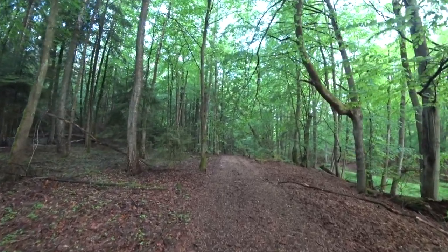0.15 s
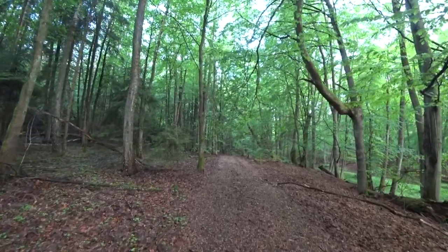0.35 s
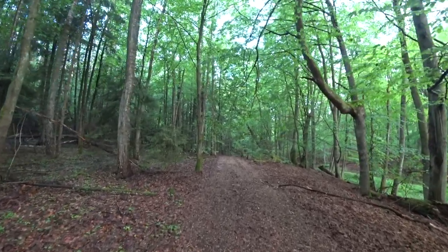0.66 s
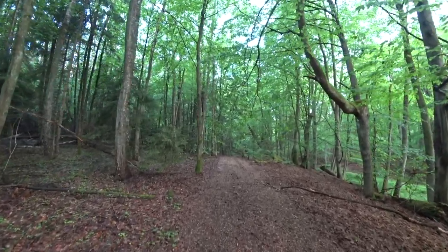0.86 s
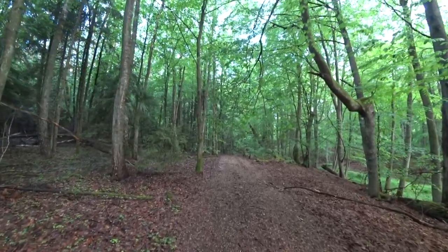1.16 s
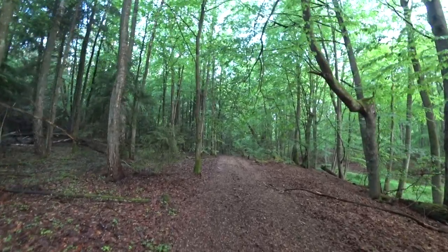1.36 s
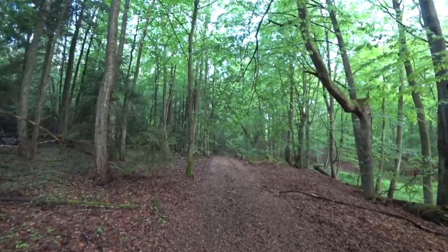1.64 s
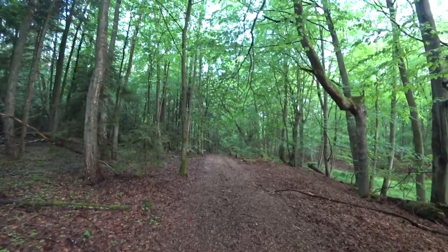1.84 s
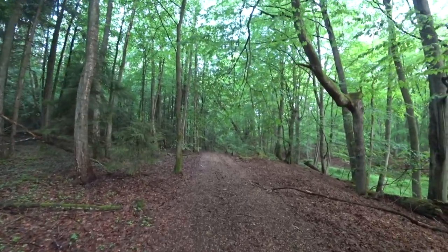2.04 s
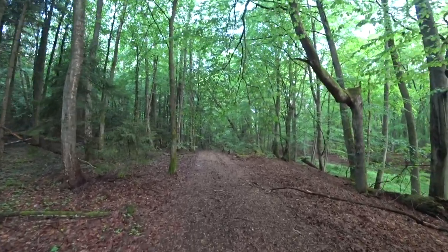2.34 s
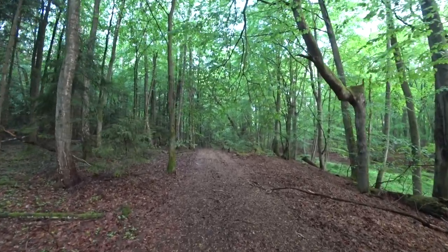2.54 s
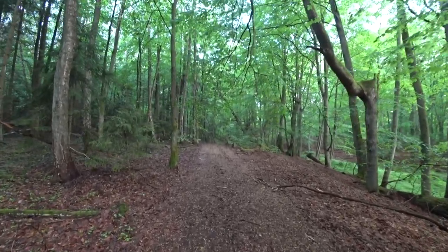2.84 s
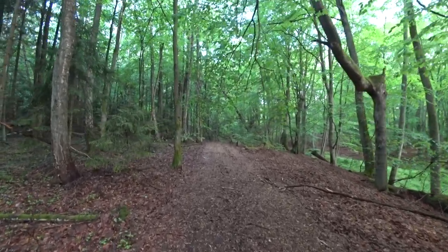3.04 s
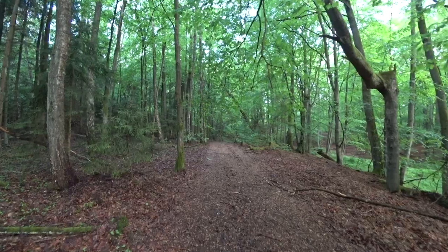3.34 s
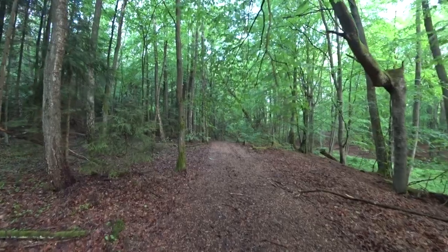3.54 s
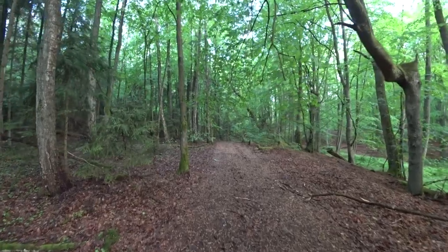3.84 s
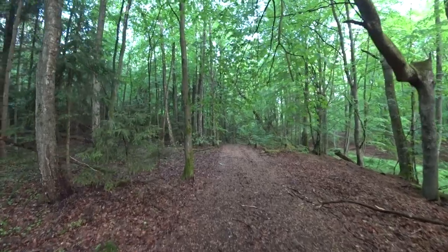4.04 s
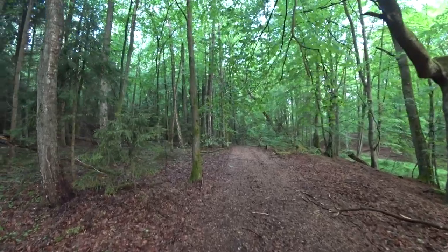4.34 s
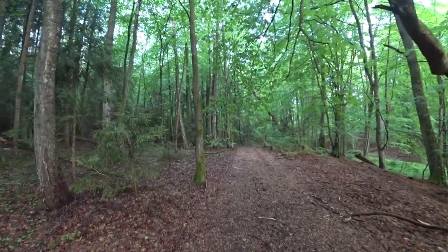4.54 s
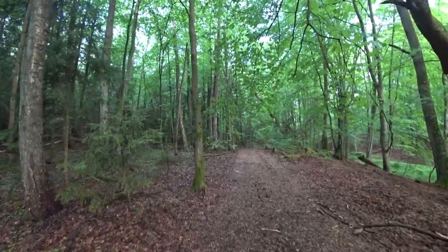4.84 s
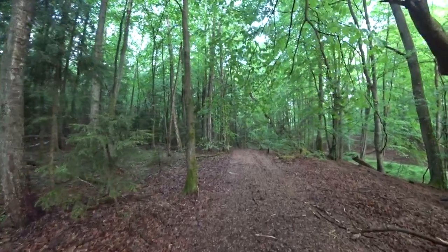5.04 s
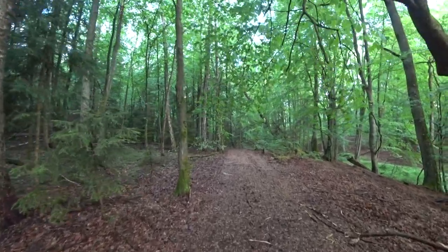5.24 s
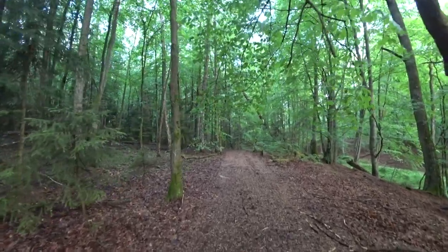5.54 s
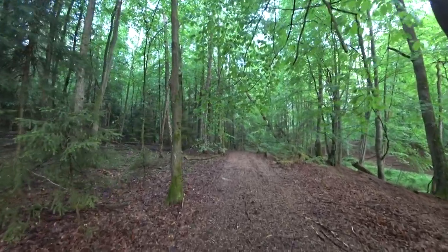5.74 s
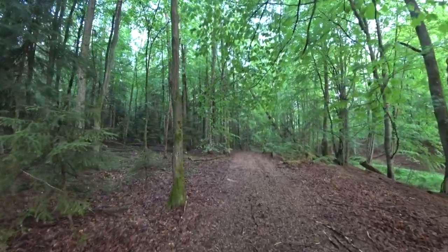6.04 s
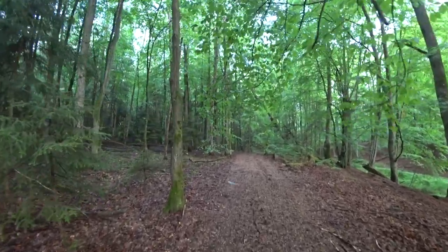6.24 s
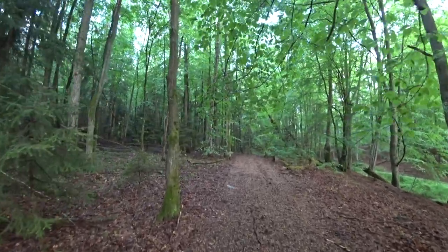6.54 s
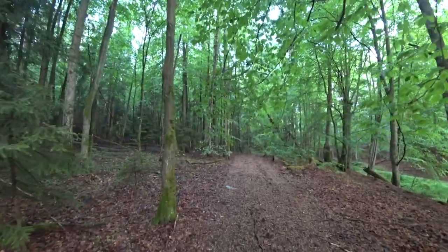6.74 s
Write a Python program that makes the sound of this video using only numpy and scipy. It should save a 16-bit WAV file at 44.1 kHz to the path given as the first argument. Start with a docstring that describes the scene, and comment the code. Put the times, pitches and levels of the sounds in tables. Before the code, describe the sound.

Songbirds chirp and whistle in a forest, one nearby speeding into a trill, over soft footsteps on dry leaves and faint wind.

```python
"""A near warbler speeds its chips into a trill in a beech wood at dawn. A thrush pipes three phrases
and other songbirds answer near and far. Each note is a gliding, nearly pure syrinx tone that the
trunks throw back. Someone walks the path, crushing dry leaves and snapping twigs; low wind and
leaf hiss lie underneath. All is centred but a faint microphone hiss."""
import sys
import numpy as np
from scipy import signal
from scipy.io import wavfile
from scipy.ndimage import uniform_filter1d

SR = 44100
rng = np.random.default_rng(int(sys.argv[2]) if len(sys.argv) > 2 else 0)


def output_pcm(signal):
    """Save a mono or channel-first signal as 16-bit PCM at the path in sys.argv[1].

    Samples are clipped to [-1, 1] before scaling.
    """
    pcm = np.clip(np.atleast_2d(signal).T, -1, 1) * 32767
    wavfile.write(sys.argv[1], SR, np.round(pcm).astype(np.int16))


N = 303849
LEAD = SR  # samples ahead of time zero, so earlier song still echoes


def amp(db):
    return 10 ** (np.asarray(db) / 20)


def unit_rms(x):
    return x / np.sqrt(np.mean(x ** 2) + 1e-20)


def smooth_twice(x, size):
    return uniform_filter1d(uniform_filter1d(x, size), size)


def curve_at(points, hz):
    point_hz, value = np.transpose(points)
    return np.interp(np.log(hz + 1), np.log(point_hz + 1), value)


def add(mix, start_s, sound):
    part = mix[LEAD + round(start_s * SR):][:len(sound)]
    part += sound[:len(part)]


def whistle(hz, level, second_db=-62, third_db=-60):
    """Syrinx tone: near sine with overtones, pitch slightly unsteady."""
    waver = unit_rms(uniform_filter1d(rng.standard_normal(len(hz)), size=200))
    phase = 2 * np.pi * np.cumsum(hz * (1 + .008 * waver)) / SR
    second = amp(second_db) * np.sin(2 * phase)
    third = amp(third_db) * np.sin(3 * phase) * (3 * hz < SR / 2)
    return level * (np.sin(phase) + second + third)


def trunk_echo(x, early_db, early_t60_s):
    """Scatter from trunks: a quick part, then a tail whose treble dies first."""
    # Each row: frequency in Hz, tail T60 in seconds.
    tail_t60 = [(1500, 1.56), (4000, 1.68), (8000, 1.26), (14000, 0.43)]
    hz, t, spectra = signal.stft(rng.standard_normal((3, 2 * SR)), SR, nperseg=128)
    fade = amp(-60 * t / curve_at(tail_t60, hz)[:, None]) + amp(early_db - 60 * t / early_t60_s)
    tails = signal.istft(spectra * fade, SR, nperseg=128)[1]
    tails[:, :round(.007 * SR)] = 0
    tails /= np.linalg.norm(tails[0])
    # Three tails take turns as air and leaves change the paths.
    phase = np.pi * (6 * np.arange(len(x)) / SR + np.arange(3)[:, None] / 3)
    weights = np.sqrt(2 / 3) * np.cos(phase)
    return signal.fftconvolve(x * weights, tails, axes=1).sum(0)[:len(x)]


def far_chorus():
    """Distant warbling: pitch wanders fast between two limits; only the echo arrives."""
    # Each row: start and length in seconds, level in dB, low and high limit in Hz.
    warbles = [(-.4, 0.43, -37.5, 3574, 6580), (0.844, 0.12, -41, 3970, 6070),
               (4.492, 0.52, -52, 4540, 6780), (5.8, 0.29, -45.5, 5660, 8560),
               (6.068, 0.093, -43, 3050, 4906)]
    sung = np.zeros(N + LEAD)
    for start_s, length_s, db, low_hz, high_hz in warbles:
        wander = unit_rms(smooth_twice(rng.standard_normal(SR), 350))[:round(length_s * SR)]
        height = .5 + np.arcsin(np.sin(2 * wander)) / np.pi  # folded into 0..1
        level = amp(db) * signal.windows.tukey(len(height), .2)
        add(sung, start_s, whistle(low_hz + (high_hz - low_hz) * height, level))
    return trunk_echo(sung, early_db=3, early_t60_s=.3)


def hiss(spectrum, patchy_db):
    """Shaped noise at unit RMS with drifting patches, steadier in the bass."""
    frames, hz = N // 256 + 5, np.fft.rfftfreq(1024, 1 / SR)
    real, imag, patches = rng.standard_normal((frames, 513, 3)).T
    patches = uniform_filter1d(patches, size=12, axis=0)
    patches = unit_rms(uniform_filter1d(patches, size=14, axis=1))
    db = curve_at(spectrum, hz)[:, None] + patchy_db * patches * (hz / (hz + 400))[:, None]
    return unit_rms(signal.istft((real + 1j * imag) * amp(db), nperseg=1024, noverlap=768)[1][:N])


def wind():
    """Low wind and leaf hiss."""
    # Each row: frequency in Hz, relative noise density in dB.
    spectrum = [(12, -30), (20, 15), (64, -2.5), (208, -11.5), (1310, -22), (2940, -22.5), (3370, -20.5),
                (4590, -19.5), (8230, -25.5), (15600, -38.5)]
    return amp(-45) * hiss(spectrum, patchy_db=1.3)


def microphone_hiss():
    """Faint self-noise, opposite in left and right."""
    # Each row: frequency in Hz, relative noise density in dB.
    spectrum = [(24, -41), (40, -7), (198, 3.5), (842, -0.5), (3010, -25), (3670, -26), (5340, -23),
                (6690, -15), (15600, 1.5)]
    return amp(-64) * hiss(spectrum, patchy_db=-5.5) * np.array([[1], [-1]])


def flutter(x, limit_db):
    """Moving air and leaves along the path make the level shiver."""
    shiver = unit_rms(smooth_twice(rng.standard_normal(N + LEAD), 120))
    return x * amp(limit_db * np.tanh(shiver))


def glide(length_s, start_hz, mid_hz, end_hz):
    """Pitch along a parabola through three points."""
    u = np.linspace(0, 1, round(length_s * SR))
    return 2 * (u - .5) * (start_hz * (u - 1) + end_hz * u) - 4 * mid_hz * u * (u - 1)


def sing(notes, fade_share, direct_db=None, tilt_db=0):
    """Whistled glides on two tracks: as sung, and with each note scaled by its direct_db."""
    sung, direct = np.zeros((2, N + LEAD))
    for k, (start_s, length_s, db, *path_hz) in enumerate(notes):
        hz = glide(length_s, *path_hz)
        fade = signal.windows.tukey(len(hz), fade_share)
        tone = whistle(hz, amp(db + tilt_db * np.linspace(-.5, .5, len(hz))) * fade)
        add(sung, start_s, tone)
        add(direct, start_s, tone * amp(direct_db[k] if direct_db else 0))
    return np.array([sung, direct])


def repeats(song, start_s, period_s, count):
    """Rows for one note repeated evenly, its level going from first_db to last_db."""
    first_db, last_db, length_s, *path_hz = song
    return [(start_s + k * period_s, length_s, db, *path_hz)
            for k, db in enumerate(np.linspace(first_db, last_db, count))]


def songbirds():
    """Scattered notes, the far ones mostly echo, and three birds that repeat a figure."""
    # Each row: start and length in seconds, level in dB, start and end pitch in Hz, distance in metres.
    calls = [(0.046, 0.011, -37, 5680, 6600, 8.1), (0.08, 0.012, -32, 5110, 6400, 12.5),
             (0.134, 0.017, -31, 5730, 3980, 18), (0.222, 0.011, -41, 3830, 6100, 15),
             (0.228, .01, -38, 6140, 6070, 9.2), (0.261, 0.0098, -31, 5620, 5520, 12),
             (0.317, 0.018, -35.5, 5650, 4630, 13), (0.405, 0.028, -30.5, 4340, 4003, 18),
             (0.439, 0.014, -32, 4100, 3870, 18), (0.428, 0.016, -49, 7200, 7300, 41),
             (0.487, 0.044, -32, 6060, 3724, 12.7), (0.532, 0.039, -48.5, 7950, 7670, 41),
             (0.567, 0.019, -43, 4030, 4980, 12), (0.586, 0.013, -34.5, 5120, 5830, 12),
             (0.636, 0.019, -33, 4690, 5260, 6.4), (0.646, 0.014, -39.5, 5340, 5870, 9.4),
             (0.698, 0.014, -39.5, 3610, 2920, 10), (0.709, 0.06, -41, 3200, 3795, 16),
             (0.734, 0.046, -45, 7480, 6230, 22), (0.781, 0.067, -33.5, 6350, 3800, 15),
             (0.94, 0.064, -53, 7300, 7700, 54), (1.037, 0.018, -51, 6700, 8700, 10),
             (1.048, 0.033, -49, 8700, 6940, 18), (1.178, 0.073, -54, 7100, 6760, 42),
             (1.468, 0.032, -44.5, 5820, 6500, 50), (2.089, 0.052, -44, 5100, 3770, 18),
             (2.169, 0.034, -41, 7300, 7660, 59), (2.351, 0.025, -41.5, 3490, 5670, 22),
             (2.382, 0.042, -42.5, 5370, 3790, 15), (2.475, 0.022, -42.5, 3700, 5880, 15),
             (2.488, 0.043, -43.5, 5950, 5440, 9.9), (2.605, 0.027, -40, 3246, 5030, 15),
             (3.041, 0.0089, -37, 4660, 7130, 29), (3.214, 0.032, -38, 4620, 4430, 15),
             (3.351, 0.033, -52, 4480, 4500, 18), (3.331, 0.025, -37, 6000, 4760, 35),
             (3.389, 0.052, -37, 2405, 2330, 17), (4.069, 0.089, -49, 4300, 2300, 7.8),
             (4.169, 0.062, -37, 2380, 2276, 7.1), (4.517, 0.04, -42.5, 6430, 6540, 38),
             (4.636, 0.018, -35.5, 2704, 4760, 49), (4.658, 0.025, -35, 4124, 2750, 21),
             (4.674, 0.023, -40, 2660, 3290, 6.9), (4.713, 0.0172, -43.5, 3400, 2500, 7.4),
             (4.818, 0.058, -43.5, 6950, 6090, 40), (4.87, 0.055, -45, 5960, 5800, 45),
             (5.1, 0.18, -63, 3740, 3760, 53), (5.44, .09, -55, 3800, 3770, 60),
             (5.243, 0.091, -54, 6640, 6760, 30), (5.533, 0.06, -48.5, 4270, 3210, 17),
             (5.56, 0.059, -48, 5250, 5670, 61), (5.74, 0.058, -53, 2860, 3210, 45),
             (5.772, 0.011, -39, 8800, 7870, 40), (5.79, 0.018, -46, 8100, 7520, 41),
             (5.81, 0.04, -45, 3940, 3520, 41), (6.014, 0.09, -40.5, 5510, 3160, 46),
             (6.092, 0.037, -47, 3300, 3170, 50), (6.525, 0.06, -53, 1828, 1770, 12),
             (6.574, 0.017, -38, 2315, 2490, 23), (6.576, 0.056, -39, 2513, 3104, 47),
             (6.67, 0.027, -45, 3350, 3410, 7.1), (6.689, 0.02, -39.5, 2980, 3180, 8.4),
             (6.705, 0.011, -37, 3470, 2740, 6.4), (6.712, 0.033, -33, 2657, 2542, 9.8),
             (6.757, 0.014, -41.5, 2710, 2060, 6.9), (6.779, 0.031, -39, 2496, 2593, 8.6)]
    # Each song: first and last level in dB, note length in seconds, start, middle and end pitch in Hz.
    rise_song = (-43, -50, .038, 4220, 4640, 6150)
    drop_song = (-45, -42.5, .028, 3620, 3210, 3200)
    fall_song = (-44, -44, .047, 3850, 3350, 2350)
    upturn_song = (-47, -47, .016, 2500, 2950, 3600)
    mid_share, echo_equal_m = .59, 13  # glide done by mid-note; range where direct tone equals echo
    notes = [(start_s, length_s, db, start_hz, start_hz + mid_share * (end_hz - start_hz), end_hz)
             for start_s, length_s, db, start_hz, end_hz, _ in calls]
    direct_db = [20 * np.log10(echo_equal_m / distance_m) for *_, distance_m in calls]
    sung, direct = flutter(sing(notes, fade_share=.55, direct_db=direct_db), limit_db=4.5)

    rise_notes = repeats(rise_song, start_s=1.267, period_s=.0918, count=8)
    rises = flutter(sing(rise_notes, fade_share=.25, tilt_db=-10)[0], limit_db=3)
    drop_notes = repeats(drop_song, start_s=2.711, period_s=.0628, count=8)
    drops = sing(drop_notes, fade_share=.037)[0]
    fall_notes = repeats(fall_song, start_s=3.255, period_s=.15, count=4)
    fall_notes += repeats(upturn_song, start_s=3.315, period_s=.15, count=4)
    falls = flutter(sing(fall_notes, fade_share=.3, tilt_db=6)[0], limit_db=3.75)

    echo = trunk_echo(sung + amp(-.5) * rises + amp(-3.5) * drops, early_db=3.5, early_t60_s=.078)
    blurred_falls = amp(-7) * falls + trunk_echo(falls, early_db=14, early_t60_s=.08)  # nearby leaves
    return direct + rises + drops + blurred_falls + flutter(echo, limit_db=2.25)


def leaf_crunch():
    """Dry leaves crackle in clumped grains under each step."""
    # Each row: start and length in seconds, level in dB.
    steps = [(0.17, 0.18, -50.5), (0.7, 0.14, -48.5), (0.858, 0.13, -48.5), (2.38, 0.1, -45),
             (2.617, 0.11, -46.5), (2.812, 0.062, -46.5), (3.204, 0.12, -45), (3.506, 0.12, -46.5),
             (4.148, 0.26, -48.5), (4.767, 0.16, -47.5), (5.925, 0.22, -46.5), (6.174, 0.055, -48),
             (6.807, 0.098, -43.5)]
    # Each row: frequency in Hz, relative noise density in dB.
    spectrum = [(150, 12.5), (600, 14.5), (2000, 9.5), (5000, 10.5), (12000, 0), (16000, -45)]
    grains_per_s = 2500
    crunch = np.zeros(N + LEAD)
    for start_s, length_s, db in steps:
        add(crunch, start_s, amp(db) * np.hanning(round(length_s * SR)))
    grain_db = 3 * np.minimum(rng.exponential(1, N), 4)
    grains = amp(grain_db) * (rng.random(N) < grains_per_s / SR)
    clumps = unit_rms(signal.oaconvolve(grains, np.exp(-np.arange(200) / 40))[:N])
    crunch[LEAD:] *= clumps * hiss(spectrum, patchy_db=4.5)
    return crunch


def thrush():
    """Fluted phrases, a pipe then an arch, far enough that echo rivals the direct tone."""
    # Each row: pipe start, arch start and arch length in seconds, pipe level in dB,
    # pipe pitch and warble depth in Hz, arch level in dB, arch top in Hz.
    phrases = [(0.711, 0.862, .182, -35, 2690, 30, -36, 3400),
               (1.183, 1.335, .178, -32.5, 2800, 200, -37, 3520),
               (1.858, 2.036, .172, -33, 2740, 100, -37, 3380)]
    # Each row: share of arch length, share of top pitch.
    arch_pitch = [(0, .47), (.1, .8), (.2, 1), (.38, .98), (.54, .86), (.64, .72), (.76, .65), (1, .57)]
    # Each row: share of arch length, relative level in dB.
    arch_level = [(0, -24), (.09, -8), (.25, 1), (.6, -2), (.88, -5), (1, -12)]
    slur_from_hz, slur_s, slur_quiet_db, fade_db_per_s = 1500, .014, 25, 110
    warble_rate_hz, crest_s = 20, .032
    sung = np.zeros(N + LEAD)
    for pipe_s, arch_s, length_s, pipe_db, pipe_hz, depth_hz, arch_db, top_hz in phrases:
        t = np.arange(0, arch_s - pipe_s, 1 / SR)
        slur = np.exp(-(t / slur_s) ** 2)  # the pipe starts low and quiet
        warble_hz = depth_hz * np.cos(2 * np.pi * warble_rate_hz * (t - crest_s))
        hz = pipe_hz - (pipe_hz - slur_from_hz) * slur + warble_hz
        level = amp(pipe_db - slur_quiet_db * slur ** .8 - fade_db_per_s * t)
        add(sung, pipe_s, whistle(hz, level * signal.windows.tukey(len(t), .05)))
        u = np.linspace(0, 1, round(length_s * SR))
        hz = top_hz * np.interp(u, *np.transpose(arch_pitch))
        level = amp(arch_db + np.interp(u, *np.transpose(arch_level)))
        add(sung, arch_s, whistle(hz, level * signal.windows.tukey(len(u), .05)))
    sung = flutter(sung, limit_db=7.5)
    return amp(-1.5) * sung + amp(-2.5) * trunk_echo(sung, early_db=-7, early_t60_s=.18)


def warbler_chips():
    """Fast rises that level off, each doubled lower by the other side of the syrinx."""
    # Each row: time in seconds, level in dB.
    chips = [(1.2473, -33.5), (1.457, -37), (1.616, -30), (1.768, -31.5), (1.9108, -30), (2.054, -30),
             (2.2045, -29), (2.348, -24), (2.497, -22.5), (2.642, -22.5), (2.785, -22), (2.908, -25),
             (3.016, -23), (3.12, -20), (3.225, -26.5)]
    upper_top_hz, lower_top_hz, last_sag_hz = 8956, 8530, 1100
    sung = np.zeros(N + LEAD)
    t = np.arange(round(.02 * SR)) / SR
    fade = signal.windows.tukey(len(t), .3)
    quiet_db = 30 * np.exp(-t / .0075)  # the low start is weak, its overtone strong
    for time_s, db in chips:
        upper_hz = upper_top_hz - 5900 * np.exp(-t / .0052)
        second_db = -40 + 1.9 * quiet_db + .5 * (db + 28)
        add(sung, time_s - .001, whistle(upper_hz, amp(db - quiet_db) * fade, second_db))
        lower_hz = lower_top_hz - last_sag_hz * (time_s == chips[-1][0]) - 2000 * np.exp(-t / .00552)
        lower = whistle(lower_hz, amp(db - 9 - 200 * t) * fade, second_db=-40 + .86 * quiet_db)
        add(sung, time_s + .0088, lower)
    return sung


def warbler_trill():
    """Rising sweeps that lengthen and sink as the trill goes on, each closed by a thin high flick."""
    # Each row: start in seconds, level in dB.
    sweeps = [(3.283, -28.5), (3.335, -25.5), (3.391, -22.5), (3.444, -20.5), (3.496, -22), (3.552, -20),
              (3.607, -18), (3.661, -18), (3.719, -16.5), (3.772, -16), (3.83, -15), (3.886, -15),
              (3.946, -15), (4.004, -13.5), (4.062, -14.5), (4.122, -18.5), (4.186, -18.5)]
    # A sweep lingers low, then leaps. Each row: share of length, share of rise.
    sweep_shape = [(0, 0), (.14, .17), (.5, .36), (.72, .6), (.92, .96), (1, 1)]
    flick_loudest_s, flick_spread_s = 3.79, .36
    flick_hz = glide(.0071, 8550, 8480, 7100)
    sung = np.zeros(N + LEAD)
    for start_s, db in sweeps:
        age_s = start_s - sweeps[0][0]
        length_s = .024 + .0125 * age_s
        foot_hz, top_hz = 5376 - 1900 * age_s, 7854 - 404 * age_s
        u = np.linspace(0, 1, round(length_s * SR))
        risen = uniform_filter1d(np.interp(u, *np.transpose(sweep_shape)), size=200, mode="nearest")
        hz = foot_hz + (top_hz - foot_hz) * risen
        dip_db = 3 * np.exp(-((u - .47) / .33) ** 2)  # weaker where the leap starts
        fade = np.minimum(u / .3, 1) ** 2 * np.minimum((1 - u) / .13, 1)
        level = amp(db - 3.8 * (u - .7) ** 2 - dip_db) * fade
        add(sung, start_s, whistle(hz, level, second_db=-28 - 13.5 * u, third_db=-39))
        flick_db = -36.5 - 10 * ((start_s - flick_loudest_s) / flick_spread_s) ** 2
        add(sung, start_s + length_s - .003, whistle(flick_hz, amp(flick_db) * np.hanning(len(flick_hz))))
    return sung


def warbler():
    """The near bird: direct song, first bounces off ground and trunks, then dense scatter."""
    # Each row: delay in seconds, gain in dB.
    bounces = [(.0055, -17), (0.011, -15)]
    song = flutter(warbler_chips() + warbler_trill(), limit_db=3)
    lowpassed = signal.oaconvolve(song, signal.firwin(9, 11000, fs=SR), "same")
    dull = lowpassed + amp(-2.5) * song  # bark and leaves return less treble
    for delay_s, db in bounces:
        add(song, delay_s - LEAD / SR, amp(db) * flutter(dull, limit_db=4.5))
    return song + amp(-7.5) * trunk_echo(dull, early_db=17, early_t60_s=.3)


def twig_snaps():
    """Twigs, crisp leaves and dry stalks break and ring for a few cycles."""
    # Each row: start in seconds, level before decay in dB, pitch in Hz.
    snaps = [(2.418, -42, 594), (2.853, -26, 784), (3.374, -23, 11100), (3.507, -25, 646),
             (4.277, -25, 920), (4.304, -45, 7000), (4.8594, -51, 7000), (5.572, -24.5, 530),
             (5.7050, -12, 8000), (6.04, -24, 1310), (6.233, -27.5, 930), (6.848, -14, 3200)]
    decay_db_per_cycle = 12
    out = np.zeros(N + LEAD)
    for start_s, db, hz in snaps:
        cycles = hz * np.arange(2000) / SR
        level = amp(db - decay_db_per_cycle * cycles) * np.minimum(cycles, 1)
        add(out, start_s, level * np.sin(2 * np.pi * cycles))
    return out


def heel_thuds():
    """A heel lands: one low cycle of push and recoil."""
    # Each row: start in seconds, peak in dB, frequency in Hz.
    thuds = [(5.714, -41.5, 150), (5.849, -31, 112)]
    out = np.zeros(N + LEAD)
    t = np.arange(2000) / SR
    for start_s, db, hz in thuds:
        add(out, start_s, amp(db) * np.sin(2 * np.pi * np.minimum(hz * t, 1)))
    return out


def scene():
    """Birds, feet and wind in the centre, over microphone hiss."""
    birds = warbler() + songbirds() + thrush() + far_chorus()
    feet = leaf_crunch() + twig_snaps() + heel_thuds()
    return (birds + feet)[LEAD:] + wind() + microphone_hiss()


def record(dry):
    """Steep low-pass."""
    edge_hz = 15780
    lowpass = signal.firwin(2047, edge_hz, window=("kaiser", 10), fs=SR)
    return signal.oaconvolve(dry, lowpass[None], "same")


dry = scene()
out = record(dry)
output_pcm(out)
```